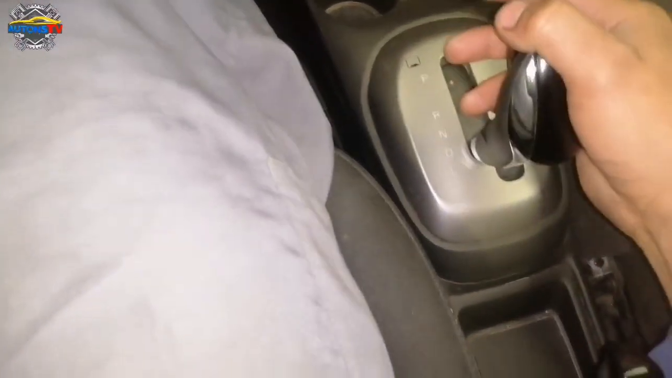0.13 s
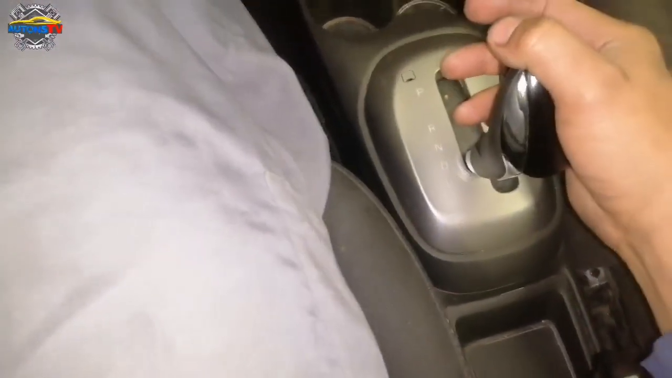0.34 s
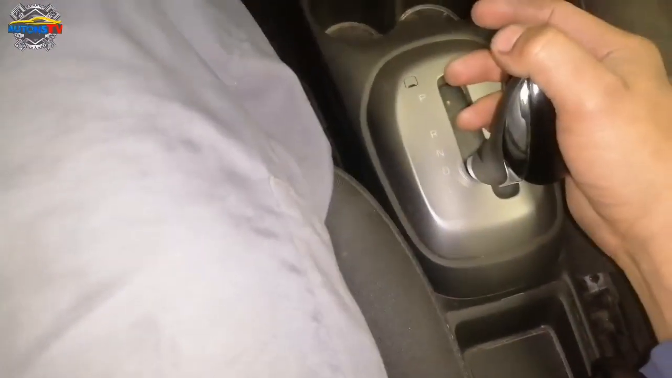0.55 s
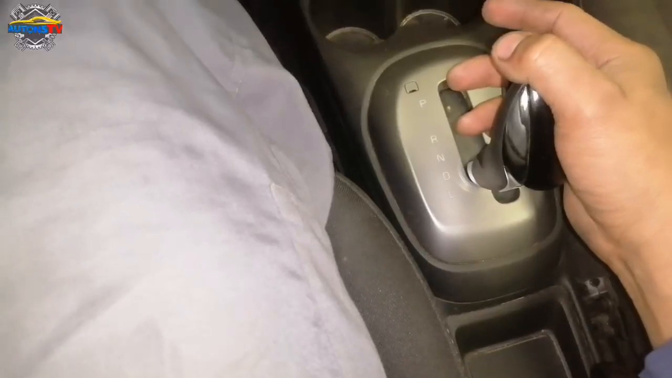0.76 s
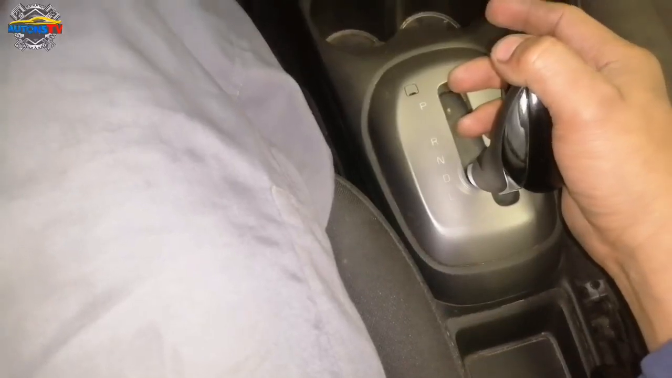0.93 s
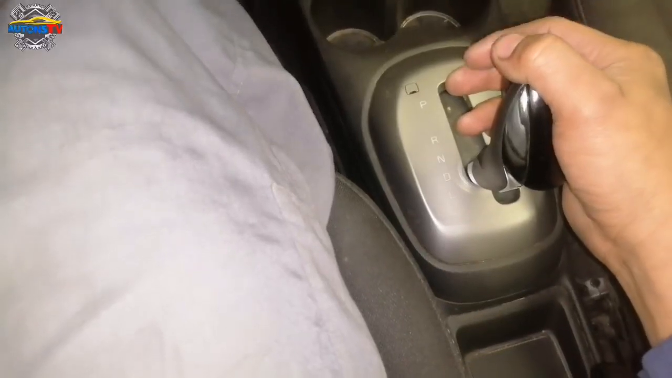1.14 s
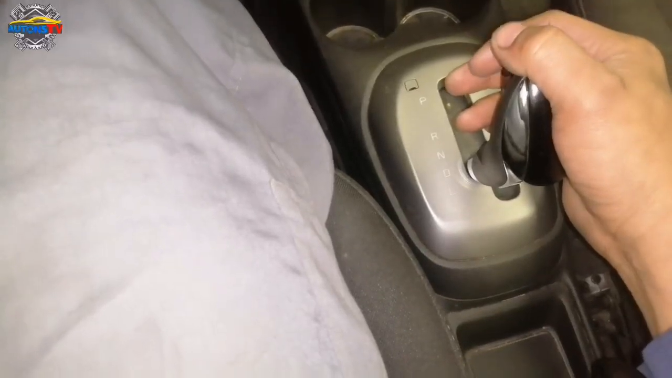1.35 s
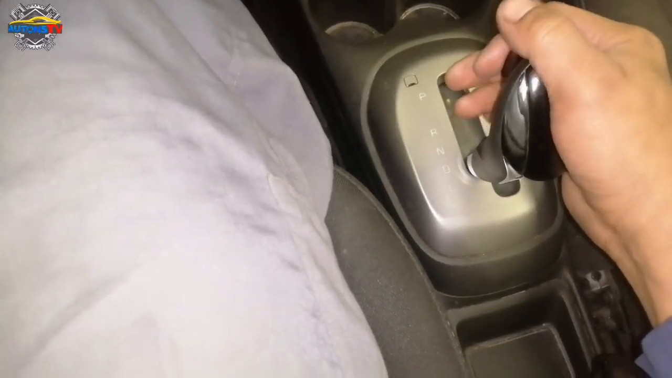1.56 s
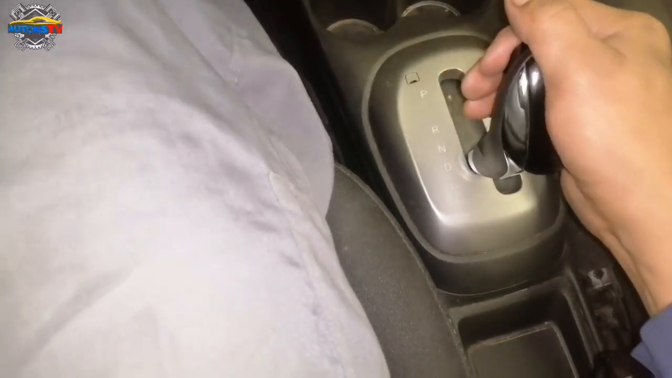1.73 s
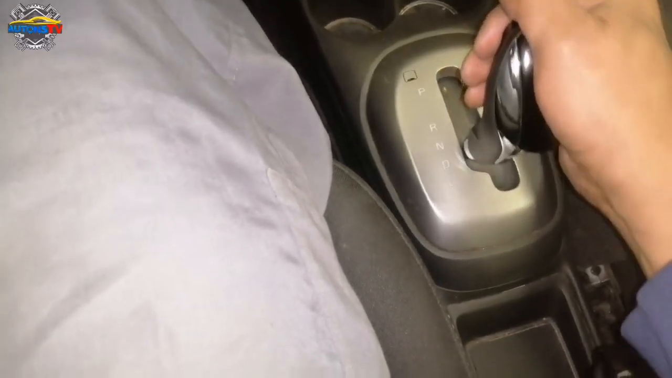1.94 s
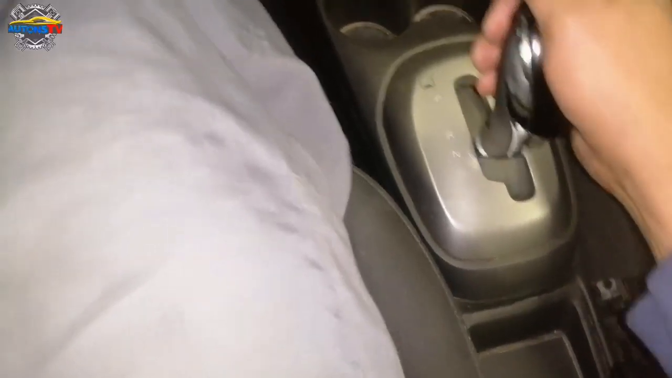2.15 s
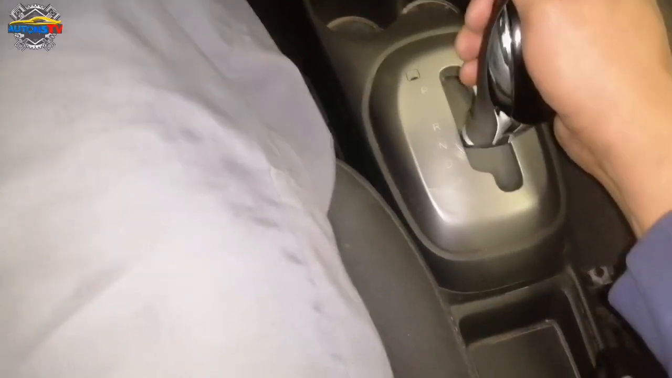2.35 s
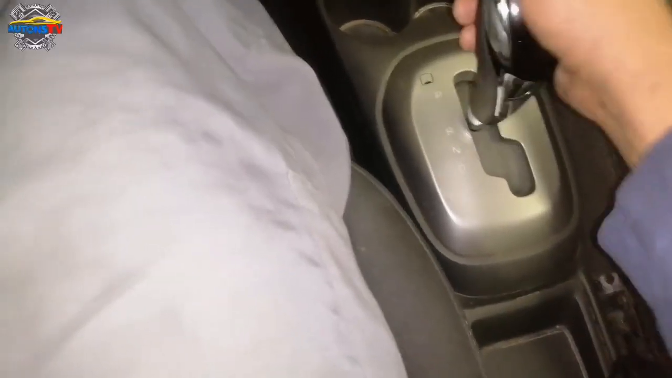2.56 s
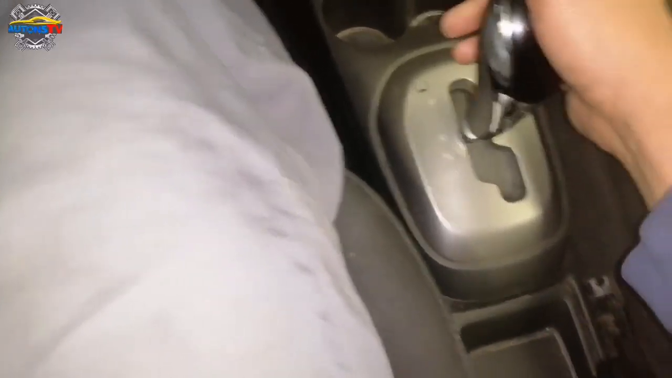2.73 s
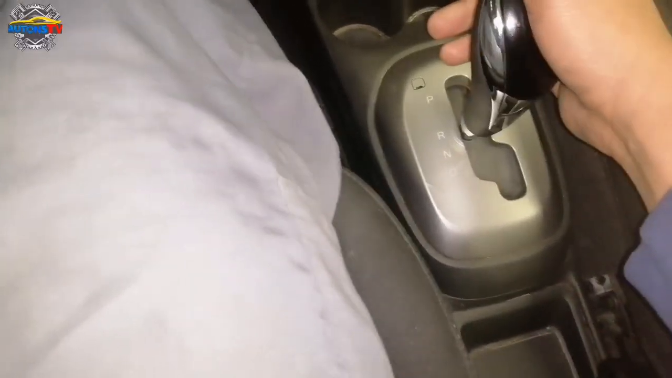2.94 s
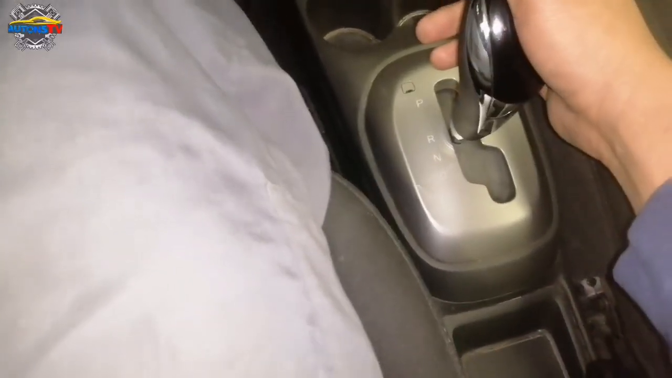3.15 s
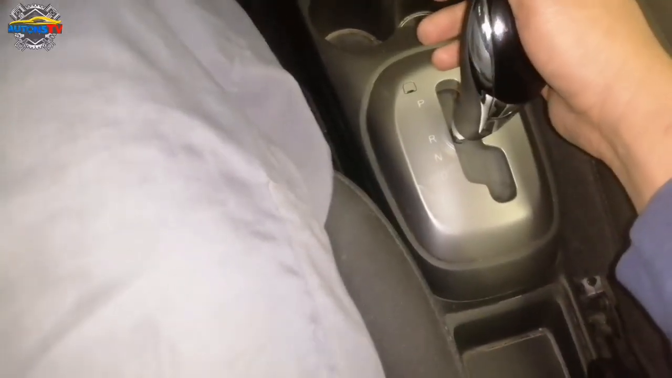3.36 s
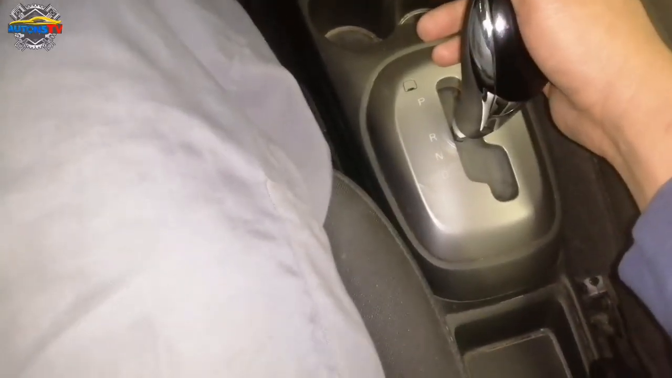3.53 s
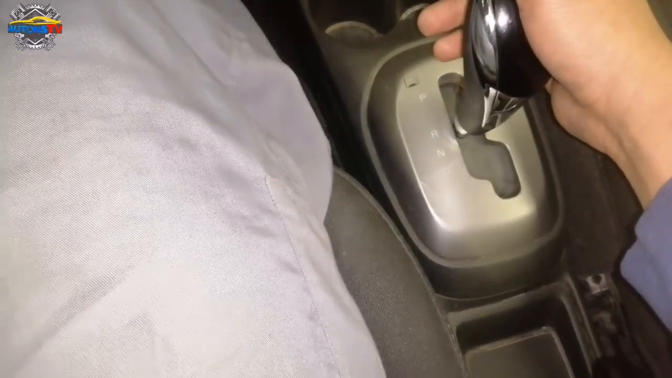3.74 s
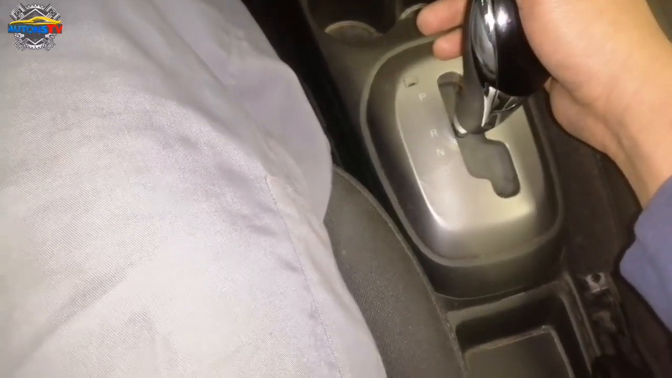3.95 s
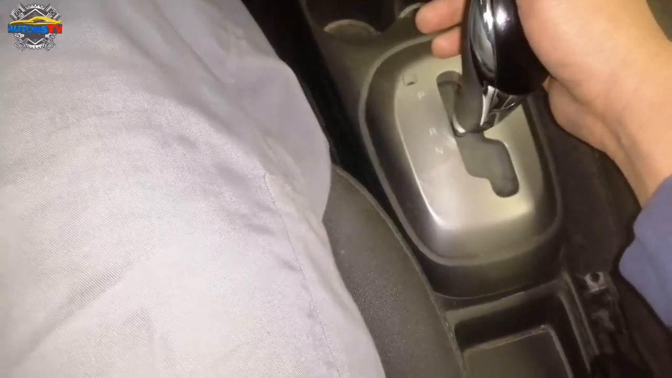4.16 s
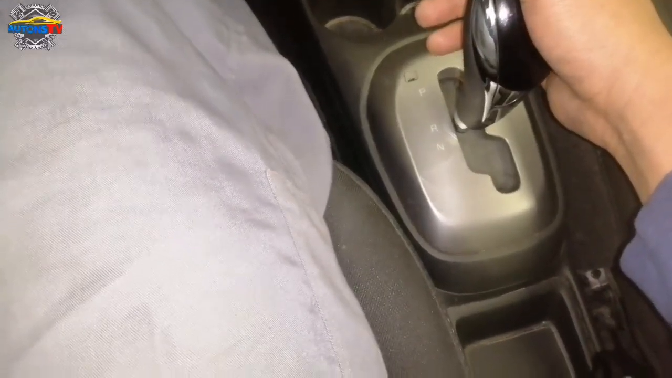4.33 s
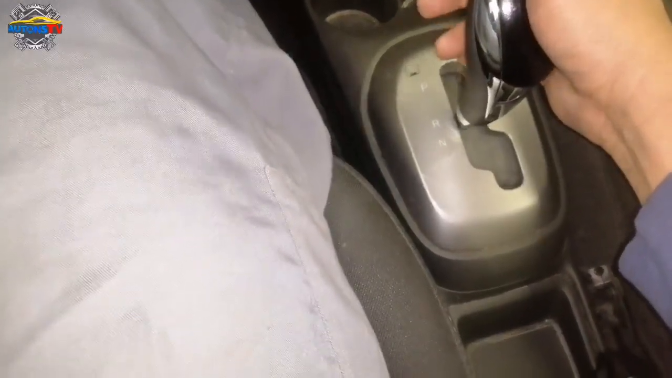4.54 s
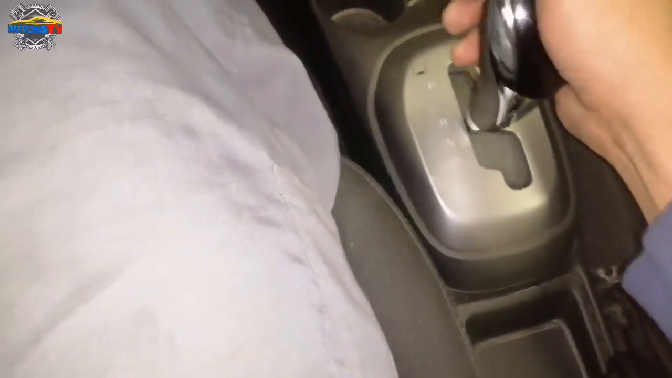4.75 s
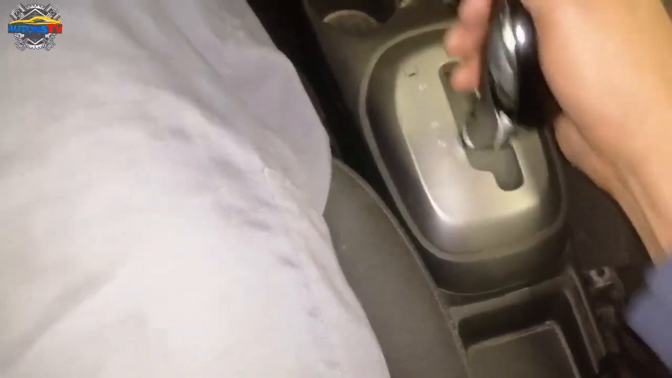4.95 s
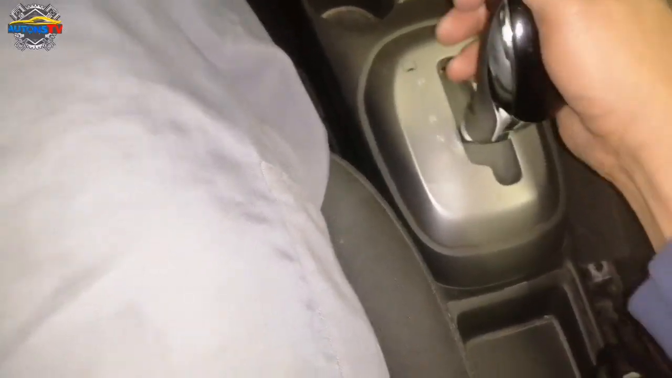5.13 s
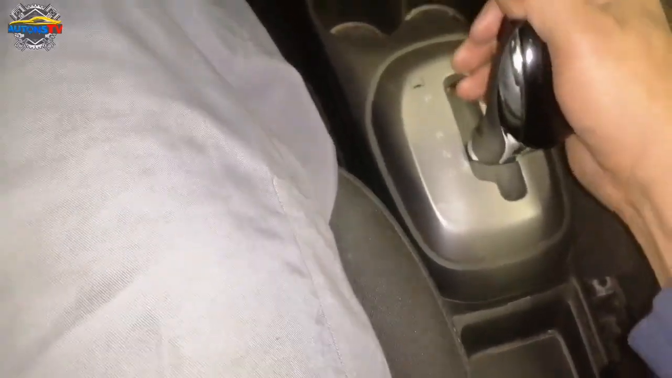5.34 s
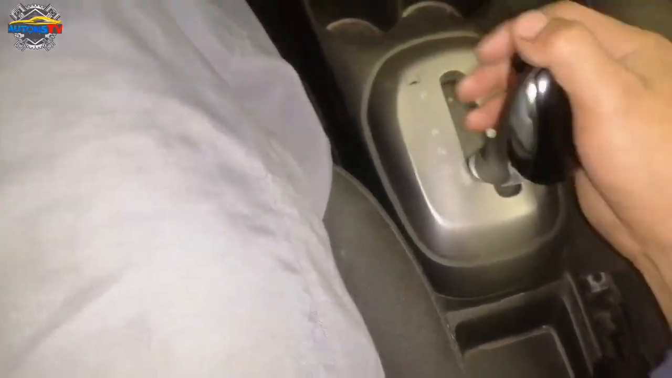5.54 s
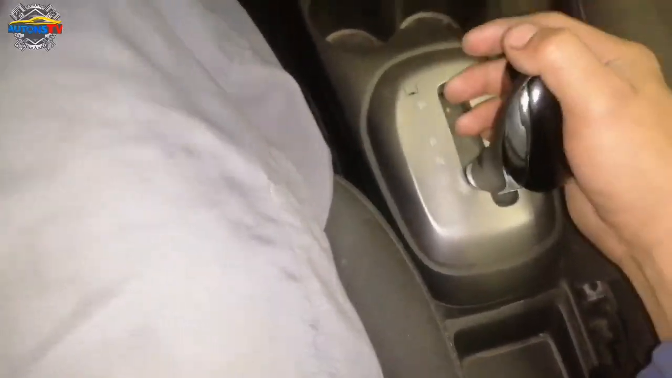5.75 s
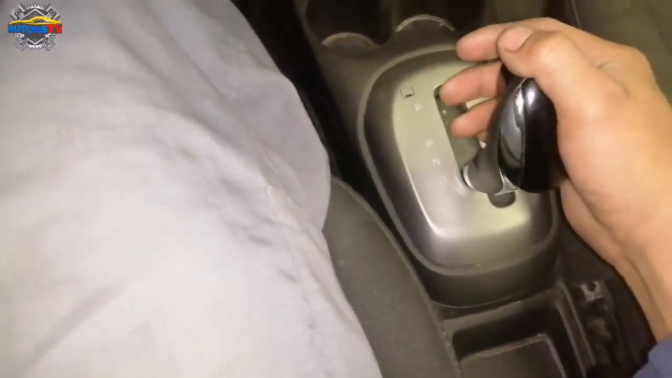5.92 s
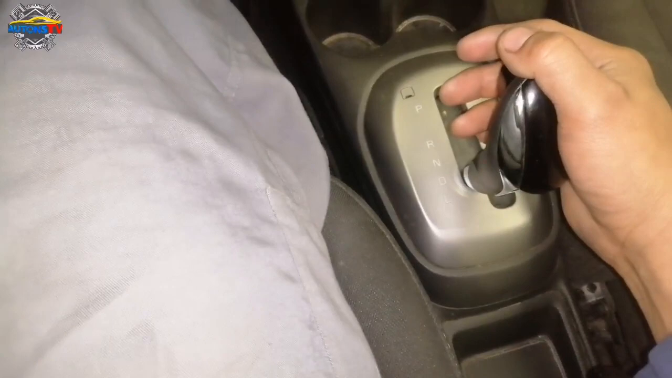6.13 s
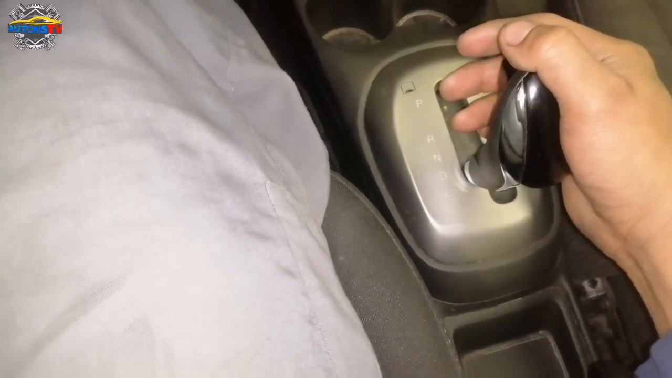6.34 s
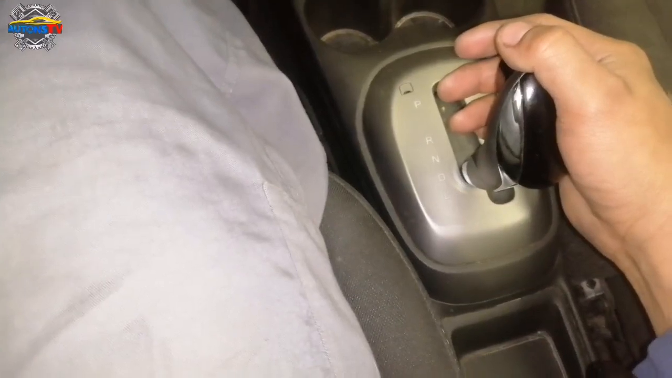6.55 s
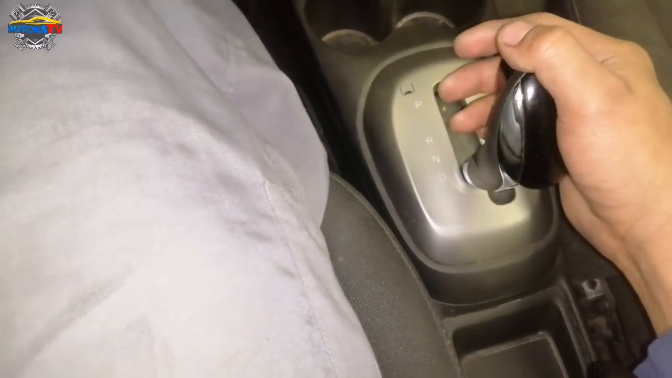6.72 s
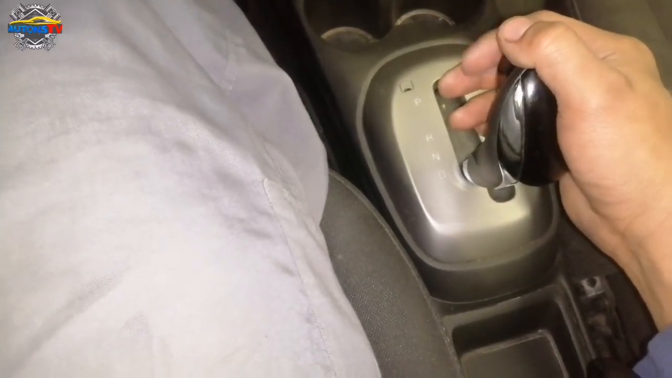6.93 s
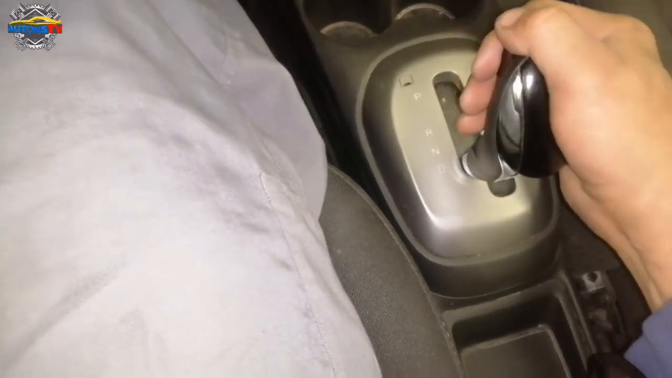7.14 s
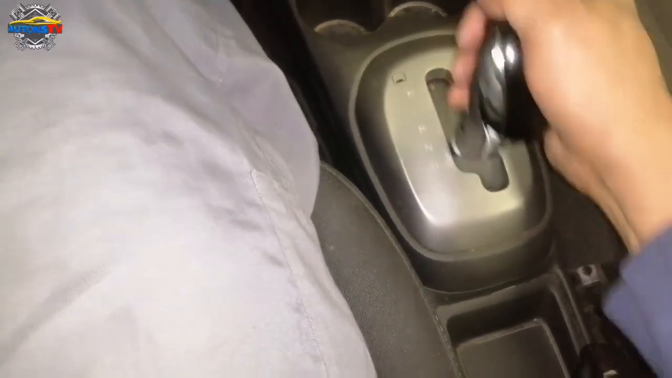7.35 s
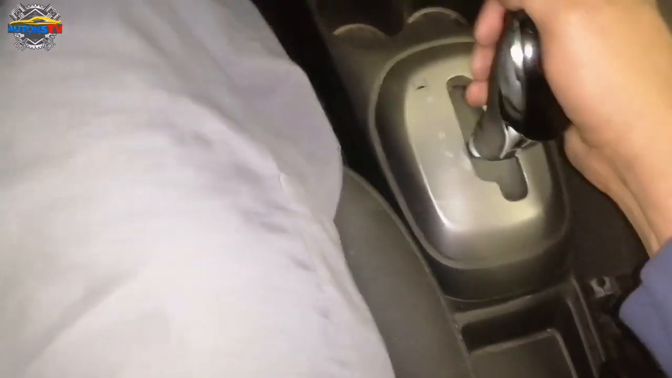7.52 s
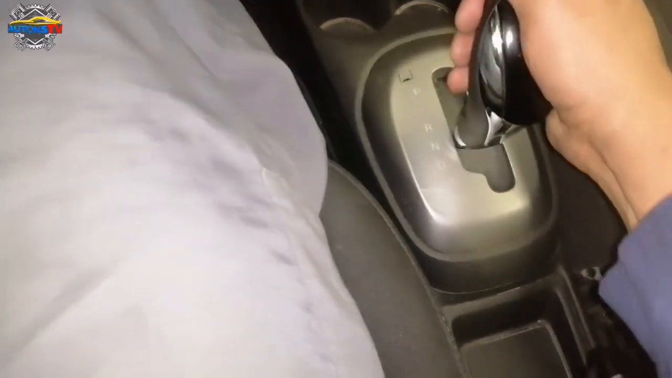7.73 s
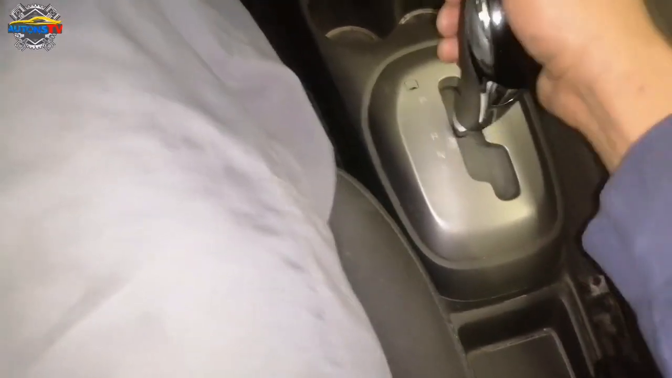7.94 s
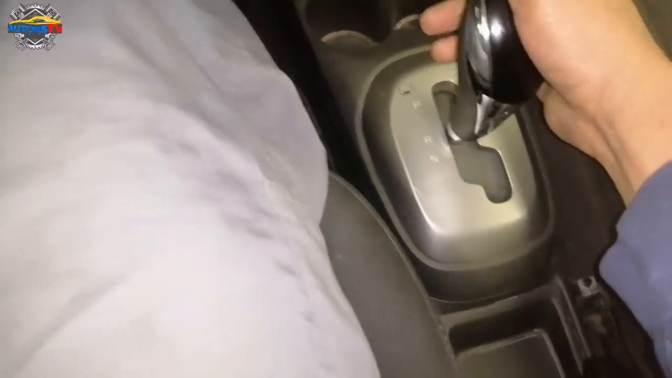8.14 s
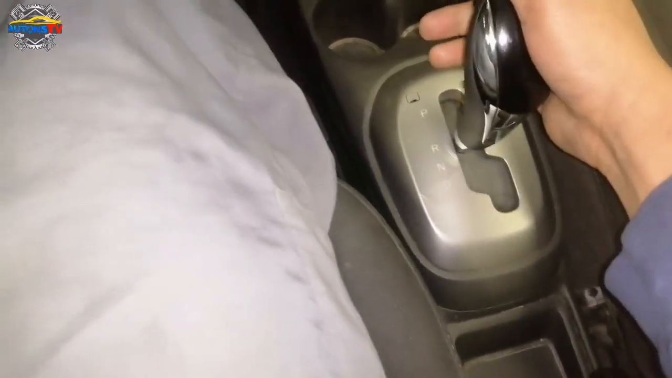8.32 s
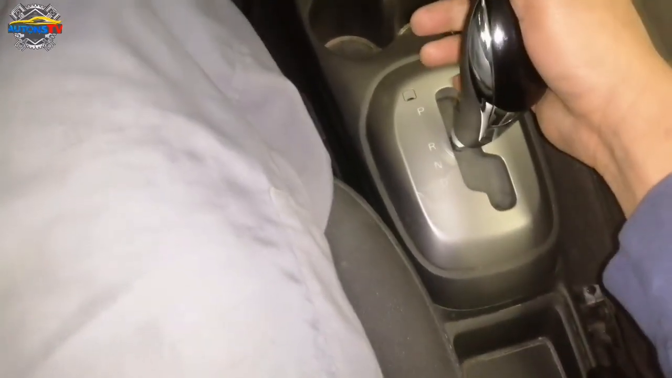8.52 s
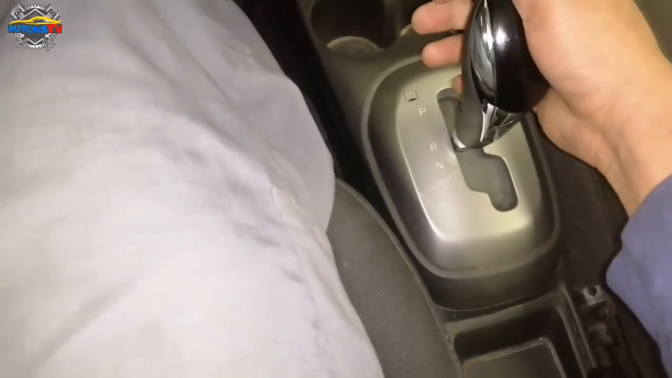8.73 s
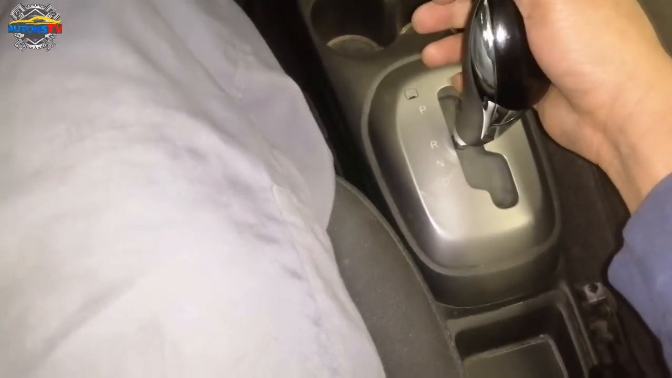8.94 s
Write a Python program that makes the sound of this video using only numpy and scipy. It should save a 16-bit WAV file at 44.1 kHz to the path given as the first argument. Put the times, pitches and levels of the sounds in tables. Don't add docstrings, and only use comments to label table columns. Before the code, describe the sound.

Hollow, sharp clunks of an automatic gear lever knocking through its gate in a parked car, over a low idling engine hum.

```python
import sys
import numpy as np
from scipy import signal
from scipy.fft import rfft, irfft, next_fast_len
from scipy.io import wavfile
from scipy.ndimage import uniform_filter1d, map_coordinates

SR = 44100
rng = np.random.default_rng(int(sys.argv[2]) if len(sys.argv) > 2 else 0)


def output_pcm(signal):
    pcm = np.clip(np.atleast_2d(signal).T, -1, 1) * 32767
    wavfile.write(sys.argv[1], SR, np.round(pcm).astype(np.int16))


def volts_from_db(level):
    exponent = np.asarray(level, float) / 20
    return 10 ** exponent


N = 400428

# start_s, knock_db, console_note_hz, plastic_db, lead_in_s
DETENTS = [
    (.054, -18, 257.8, -28, 0.04),
    (2.135, -10, 282, -25.5, 0.028),
    (2.599, -10.5, 283.5, -27, 0.042),
    (5.037, -18, 272, -30.5, .007),
    (5.559, -17, 256, -28, 0.038),
    (7.499, -10.5, 280, -22.5, 0.025),
    (7.99, -12, 282, -27.5, 0.026),
]
# start_s, knock_db, plastic_db
REBOUNDS = [(.095, -29, -41), (2.151, -37, -33), (2.165, -25.5, -38.5), (2.614, -19, -30.5),
            (2.636, -31, -37), (5.075, -24, -37), (5.574, -37, -41), (5.592, -35, -48),
            (5.613, -25.5, -45.5), (7.519, -30, -33.5), (8.013, -20, -31), (8.031, -31, -40)]
# start_s,
# knock_db, plastic_db, steel_db
TOUCHES = [(.184, -61, -54, -71), (1.58, -45, -57, -60.5), (1.714, -64, -49, -61.5),
           (1.898, -53, -51, -54.5), (2.207, -54, -61, -67), (2.247, -33, -43.5, -55),
           (2.442, -35, -48, -59), (2.681, -32, -30.5, -46), (2.738, -45.5, -44, -55),
           (5.048, -21, -32, -39.5), (5.155, -33, -42, -52.5), (5.177, -29.5, -53, -64),
           (5.33, -41.5, -54, -63), (7.106, -61, -74, -68), (7.191, -64, -54, -63),
           (7.279, -60, -57, -64.5), (7.312, -58, -53, -66), (7.43, -61, -54, -55), (7.452, -42, -66, -84),
           (7.601, -30.5, -38.5, -50), (7.826, -30.5, -47, -58.5), (5.603, -61, -59, -54),
           (8.05, -54, -40, -60), (8.062, -31, -33, -37.5), (8.134, -32.5, -45, -47),
           (8.369, -42, -70, -73)]
# start_s, knock_db, plastic_db, steel_db
STOPS = [
    (2.798, -20.5, -17.5, -20.5),
    (8.1858, -19.5, -16.5, -19.5),
]
# start_s,
# peak_db, pitch_hz, t60_s (time to fall 60 dB)
PINGS = [(0.0542, -26, 1337, 0.04), (.066, -27, 455, .06), (0.095, -32, 1340, 0.024),
         (5.571, -27, 460, .05), (5.557, -31, 1010, .035), (1.716, -48, 1740, 0.02),
         (2.683, -29.5, 1404, 0.044), (2.684, -19.5, 1070, 0.02), (2.691, -45, 3080, 0.056),
         (5.176, -42, 1320, 0.021), (5.559, -25.5, 1370, 0.026), (5.616, -45, 1300, 0.028),
         (7.1076, -52, 3110, 0.07), (8.063, -25, 1435, 0.043), (8.063, -22, 1010, 0.017)]
# start_s, end_s, first_db, last_db
SLIDES = [(2.277, 2.426, -68, -75), (2.47, 2.57, -63, -58), (2.713, 2.795, -61, -54),
          (4.81, 4.88, -63, -54), (4.88, 5.004, -54, -68), (5.28, 5.42, -56.5, -79),
          (5.45, 5.534, -68, -55), (7.33, 7.483, -70, -60), (7.627, 7.78, -51.5, -83),
          (7.855, 7.966, -48, -50.5), (8.09, 8.17, -50, -46)]
# multiple_of_main_note, level_db, share_of_t60
CONSOLE_MODES = [(.46, -12.5, 1.52), (0.719, -30.5, 1.5), (.94, -10, 1.2), (0.999, -1, 1.07),
                 (1.081, -9, 1.1), (1.4, -9, 0.76), (1.749, -18.5, 0.38), (2.05, -21, 1)]
# pitch_hz, width_hz, level_db
HOLLOW = [(187, 110, -3), (315.6, 88, 2.5), (464, 140, -5)]
# pitch_hz, width_hz, level_db
PLASTIC = [(537, 103, -2), (798, 185, 2), (970, 187, 1), (1190, 88, -2.5), (1389, 95, -4.5),
           (1640, 120, -7.5), (1960, 230, -11)]
# pitch_hz, width_hz, level_db
STEEL = [(2200, 440, 3), (3076, 410, 3), (3810, 220, 1), (4400, 350, -1.5), (5550, 530, -5),
         (7600, 740, -10), (9780, 2300, -18)]
# pitch_hz, width_hz, level_db
STOP_PLATE = [(2400, 150, -2), (2875, 190, -3), (3400, 290, -3.5), (3940, 130, 1), (4500, 270, -1.5),
              (5130, 200, -0.5), (5660, 280, -1.5), (7500, 900, -10.5), (10040, 1800, -14),
              (10600, 880, -30), (14500, 2000, -38)]
# pitch_hz, width_hz, level_db
GATE_PLATE = [(297, 110, 1.5), (440, 220, 3), (615.9, 220, -3.5), (854, 225, -5)]
# console_delay_s, console_t60_s, rattle_t60_s, crack_under_steel_db,
# share_heard_in_lead_in, lead_in_s (a notch brings its own)
FIRM, BOUNCE = (.002, .115, .075, -25, .3), (.001, .13, .07, -42, .6, .014)
LIGHT, HARD = (.003, .13, .068, -36, .55, .012), (.0004, .08, .046, -31, .22, .01)

# start_s, end_s, valve_whistle_db, air_rush_db
PEDAL_MOVES = [
    (-.1, .04, -69, -60.5),
    (0.424, .63, -70, -59.5),
    (1.018, 1.27, -69.5, -62.5),
    (1.9, 2.11, -74.5, -69.5),
    (2.246, 2.33, -76.5, -62),
    (3.56, 3.82, -76.5, -73.5),
]
# pitch_hz, width_hz, level_db
VALVE = [(4590, 130, 1.5), (5650, 210, -2), (6750, 170, 0.5), (9150, 650, -9), (10000, 280, -8),
         (11010, 590, -12.5), (13700, 300, -17)]
# pitch_hz, level_db_per_hz
RUSH = [(900, -34), (1500, -17.5), (2600, -10.5), (3600, -10.5), (4800, -16), (7000, -22.5), (11500, -41),
        (13000, -46)]
# pitch_hz, width_hz, level_db
DUCT = [(2710, 200, -13), (3640, 230, 0)]

# multiple_of_firing_rate, level_db
PATHS = [
    [(1, -1.5), (1.5, -20.5)],
    [(2, -2.2), (2.5, -10), (3, -1.5)],
    [(4, 0), (4.5, -15), (6, 0), (6.5, -18), (7, -12), (8, -14), (9, -15.5), (10, -20), (11, -19.5),
     (13, -21)],
    [(5, -1), (5.5, -19.5), (12, -27.5), (12.5, -17.5), (13.5, -19), (14, -22.5)],
]
# load_off_s, load_on_s, firing_rate_reached_hz
FREE_RUNS = [
    (0.258, 0.899, 24.09),
    (2.115, 2.55, 23.67),
    (2.721, 3.44, 24.5),
    (5.692, 6.425, 24.46),
    (8.121, 8.982, 24.91),
]
# body_db, mounts_db, floor_db, dashboard_db
FREE, DRIVE = (-49.5, -54.5, -69, -63), (-48.5, -53.5, -59, -50.5)
REVERSE, SLIPPING = (-49, -47, -46.5, -53.5), (-47.5, -64, -50, -55)
# grips_s, lets_go_s, strength_db, jolt_db
IN_DRIVE = [
    (.93, 2.336, -2, -2.5),
    (3.12, 3.307, -5, -3),
    (6.429, 7.504, 0.4, -1),
    (7.516, 7.795, 1.5, 9),
    (7.88, 8.22, 1.5, 3),
    (8.406, 8.55, -9.5, -9),
]
# grips_s, lets_go_s, strength_db, jolt_db
IN_REVERSE = [
    (-.2, 0.284, -2, 1.2),
    (2.574, 2.747, -1, 1.1),
    (3.67, 5.355, -0.1, 5.5),
    (8.984, 9.3, -1.5, 3),
]
# grips_s, lets_go_s, strength_db, jolt_db
IN_SLIP = [
    (0.306, 0.485, -8, .1),
    (0.56, 0.806, -8, .1),
    (3.474, 3.633, 0.5, .1),
    (5.383, 5.767, -1, .1),
]
# time_s, peak_db, pitch_hz, length_s
SHUNTS = [
    (0.706, -34, 27.3, 0.054),
    (3.314, -30, 27.3, 0.052),
    (3.74, -37, 83, .085),
    (6.158, -32.5, 26.2, 0.063),
    (8.724, -31, 26.75, 0.077),
    (9.07, -38, 83, .06),
]

# pitch_hz, level_db_per_hz
CABIN = [(12, -37.5), (22, -14.5), (40, -11), (86, -23), (120, -19), (177, -23.5), (300, -25), (400, -31.5),
         (560, -32.5), (900, -39.5), (1100, -43), (1400, -46), (2500, -58), (5000, -77.5)]
# pitch_hz, width_hz, level_db
CABIN_PEAKS = [(309.3, 51, 6.5), (689.5, 17, 10.5), (1070, 58, 8.5), (1260, 45, 5.5)]
# pitch_hz, level_db_per_hz
VENTS = [(700, -7.5), (1500, 0.5), (3000, -1), (5700, -7), (6100, -8), (7800, -11), (8300, -16.5),
         (11000, -20), (15100, -26.5), (15400, -61)]


def unit(x):
    return x / np.sqrt(np.mean(x ** 2) + 1e-20)


def along(points, hz):
    f, v = np.transpose(points)
    return np.interp(np.log(hz + 1), np.log(f + 1), v)


def wobble(rate):
    coarse = np.arange(0, N + 64, 64)
    knots = rng.standard_normal(int(N * rate / SR) + 4)
    return np.interp(np.arange(N), coarse, map_coordinates(knots, [coarse * rate / SR]))


def filtered(x, response):
    m = next_fast_len(len(x) + SR // 4)
    return irfft(rfft(x, m) * response(np.fft.rfftfreq(m, 1 / SR)), m)[:len(x)]


def resonances(peaks):
    def response(f):
        total = 0
        for k, (c, w, db) in enumerate(peaks):
            total = total + (-1) ** k * volts_from_db(db) * 1j * f * w / (c * c - f * f + 1j * f * w)
        return total
    return response


def noise_through(peaks, sharpness):
    return unit(filtered(rng.standard_normal(N), lambda hz: np.abs(resonances(peaks)(hz)) ** sharpness))


def swell(t, rise, fall):
    return volts_from_db(np.where(t < 0, 20 * t / rise, -60 * t / fall))


def contacts():
    def console_note():
        return 271.8 * (1 + .03 * rng.standard_normal())

    gate = []
    for s, knock, hz, plastic, lead in DETENTS:
        steel = plastic - 20.5 - 0.582 * knock
        gate.append((s, knock, hz, plastic, steel, (*FIRM, lead)))
    for s, knock, plastic in REBOUNDS:
        gate.append((s, knock, console_note(), plastic, plastic - 14, BOUNCE))
    for s, knock, plastic, steel in TOUCHES:
        gate.append((s, knock, console_note(), plastic, steel, LIGHT))
    stop = []
    for s, knock, plastic, steel in STOPS:
        stop.append((s, knock, 291, plastic, steel, HARD))
        stop.append((s + .0185, knock - 7, 291, plastic - 4, steel - 7, HARD))
    return gate, stop


def lever(gate, stop):
    return (pings() + sliding() + rattles(gate, STEEL, metal_db=8.0)
            + rattles(stop, STOP_PLATE, metal_db=10.5))


def rattles(touching, metal, metal_db):
    before = SR // 20
    t = np.arange(-before, SR // 5) / SR
    plastic, steel, crack = np.zeros((3, N + len(t)))
    for s, _, _, plastic_db, steel_db, kind in touching:
        t60, crack_db, share, lead = kind[2:]
        lead = min(lead, .04)
        at = slice(round(s * SR), round(s * SR) + len(t))
        impacts = rng.standard_normal((2, len(t))) * volts_from_db(3.3 * rng.standard_normal((2, len(t))))
        impacts *= np.where(t < 0, share, 1)
        bright = volts_from_db(steel_db + metal_db) * impacts[1]
        plastic[at] += volts_from_db(plastic_db + 9.5) * impacts[0] * swell(t, lead, 1.33 * t60)
        steel[at] += bright * swell(t, 0.349 * lead, 1.1 * t60)
        crack[at] += bright * volts_from_db(crack_db) * swell(t, .1 * lead, .025)

    def dull(peaks):
        return lambda hz: resonances(peaks)(hz) / (1 + 1j * hz / 10500) ** 2

    cracks = filtered(crack, lambda hz: resonances([(9500, 8000, 0)])(hz) ** 2)
    return (filtered(plastic, dull(PLASTIC)) + filtered(steel, dull(metal)) + cracks)[before:N + before]


def console(touching):
    before = SR // 40
    t = np.arange(-before, SR // 5) / SR
    rings, thuds = np.zeros((2, N + len(t)))
    for s, db, hz, _, _, kind in touching:
        delay, t60 = kind[:2]
        start = round((s + delay + .0035) * SR)
        at = slice(start, start + len(t))
        for multiple, level, share in CONSOLE_MODES:
            gain = volts_from_db(db - 2.7 + level + rng.normal(0, 1.25))
            envelope = uniform_filter1d(swell(t, 0.0075, share * t60), size=160)
            mode_hz = multiple * rng.normal(1, 0.013) * hz
            phase = rng.normal(0, 2.5 * abs(np.log(multiple)))
            rings[at] += gain * envelope * np.cos(2 * np.pi * mode_hz * t + phase)
        thuds[at] += volts_from_db(db + 5.5) * rng.standard_normal(len(t)) * swell(t, 0.0086, 1.3 * t60)
    thuds = filtered(thuds, lambda hz: resonances(HOLLOW)(hz) ** 2)
    return (rings + thuds)[before + 1:][:N]


def pings():
    out, t = np.zeros(N + SR // 8), np.arange(SR // 8) / SR
    for s, db, hz, t60 in PINGS:
        out[round(s * SR):][:len(t)] += volts_from_db(db - 1.5 - 60 * t / t60) * np.sin(2 * np.pi * hz * t)
    return out[:N]


def sliding():
    scrape = rng.standard_normal(N) * volts_from_db(3.5 * wobble(50))
    rubbing = unit(filtered(scrape, lambda hz: resonances(GATE_PLATE)(hz) ** 2))
    t, strokes = np.arange(N) / SR, 0
    for start, end, first, last in SLIDES:
        strokes = strokes + volts_from_db(np.interp(t, (start, end), (first, last), -140, -140))
    return uniform_filter1d(strokes, size=400) * rubbing


def servo():
    whistle = noise_through(VALVE, 1.16)
    rush = unit(filtered(rng.standard_normal(N), lambda hz: volts_from_db(along(RUSH, hz))
                         * (1 + 0.95 * np.abs(resonances(DUCT)(hz)))))
    roar = unit(filtered(rng.standard_normal(N),
                         lambda hz: resonances([(1250, 600, 0), (1800, 600, -1.5)])(hz) ** 2))
    valve = flow = 0
    for start, end, whistle_db, rush_db in PEDAL_MOVES:
        valve = valve + pedal(start, end, whistle_db, rise=.045, drift_db=-18, release=.26)
        flow = flow + pedal(start, end, rush_db, rise=.092, drift_db=19, release=.6)
    top = flow.max()
    air = flow * rush + volts_from_db(-10) * top * (flow / top) ** 1.6 * roar
    return volts_from_db(1.0 + 2.5 * wobble(29.82)) * valve * whistle + volts_from_db(0.5 + 2.2 * wobble(20)) * air


def pedal(start, end, db, rise, drift_db, release):
    t = np.arange(N) / SR
    loudest = end if drift_db > 0 else start
    travel_db = drift_db * (np.clip(t, start, end) - loudest)
    rise_db = 20 * np.maximum(start - t, 0) / rise
    release_db = 60 * np.maximum(t - end, 0) / release
    return volts_from_db(db + travel_db - rise_db - release_db)


def engine(rate_hz):
    step = 16
    turn = 2 * np.pi * np.cumsum(rate_hz)[::step] / SR
    hum = 0
    for gain, path in zip(load()[:, ::step], PATHS):
        for multiple, db in path:
            drift = -.35 * multiple ** 2 + .013 * multiple * wobble(4.4)[::step]
            level = gain * volts_from_db(db + 1.1 * wobble(6.5)[::step]) * np.sqrt(2)
            hum = hum + level * np.sin(multiple * turn + drift)
    return signal.resample_poly(hum, step, 1)[:N]


def speed():
    in_gear_hz, run_up_hz_per_s, pull_down_hz_per_s = 22.61, 7.5, 14
    t = np.arange(N) / SR
    rate_hz = np.full(N, in_gear_hz)
    for off, on, hz in FREE_RUNS:
        extra = np.minimum(run_up_hz_per_s * (t - off), pull_down_hz_per_s * (on - t))
        rate_hz += np.clip(extra, 0, abs(hz - in_gear_hz))
    return rate_hz


def load():
    grip_s, let_go_s, jolt_s = 0.1, 0.12, .15
    t = np.arange(N) / SR
    gains = volts_from_db(FREE)[:, None] * np.ones(N)
    for state, spells in ((DRIVE, IN_DRIVE), (REVERSE, IN_REVERSE), (SLIPPING, IN_SLIP)):
        for on, off, db, jolt_db in spells:
            grip = np.clip(np.minimum((t - on) / grip_s + .5, (off - t) / let_go_s + .5), 0, 1)
            jolt = volts_from_db(db + jolt_db * np.exp(-np.abs(t - on) / jolt_s))
            gains = gains + volts_from_db(state)[:, None] * grip * jolt
    return gains


def shunts():
    t, out = np.arange(N) / SR, 0
    for s, db, hz, length in SHUNTS:
        out = out + volts_from_db(db) * np.exp(-((t - s) / length) ** 2) * np.cos(2 * np.pi * hz * (t - s))
    return out


def take_up():
    s, length = .922, .024
    u = np.clip((np.arange(N) / SR - s) / length, -3, 3)
    hz = 95 + (300 - 95) / (1 + np.exp(1.8 * u))
    return volts_from_db(-45) * np.exp(-u ** 2) * np.sin(2 * np.pi * np.cumsum(hz) / SR)


def cabin(rate_hz):
    def panels(hz):
        return volts_from_db(along(CABIN, hz)) * (1 + 0.59 * np.abs(resonances(CABIN_PEAKS)(hz)))

    rumble = filtered(rng.standard_normal(N), panels)
    rumble /= np.std(filtered(rumble, lambda hz: hz > 150))
    hiss = unit(filtered(rng.standard_normal(N), lambda hz: volts_from_db(along(VENTS, hz))))
    turn = 2 * np.pi * np.cumsum(rate_hz) / SR
    speed_db = 0.31 * (rate_hz - 23)
    swell_db = 0.4 * np.sin(turn / 2) + 0.19 * wobble(1.6) + .5 * wobble(9.2)
    hiss_db = -72 + 0.54 * speed_db + 0.33 * wobble(1.3)
    return volts_from_db(-55 + speed_db + swell_db) * rumble + volts_from_db(hiss_db) * hiss


def scene():
    gate, stop = contacts()
    rate_hz = speed()
    hand = lever(gate, stop) + console(gate + stop)
    car = engine(rate_hz) + shunts() + take_up() + cabin(rate_hz)
    return (hand + servo() + car)[None]


def band_limit(x):
    return signal.sosfilt(signal.butter(12, 16370, fs=SR, output="sos"), x)


def record(dry):
    closing = np.clip(np.arange(N)[::-1] / 120, 0, 1)
    rolled = filtered(dry[0] * closing, lambda hz: volts_from_db(along([(15000, -0.5), (15500, -19.5)], hz)))
    return band_limit(rolled[None])


dry = scene()
out = record(dry)
output_pcm(out)
```